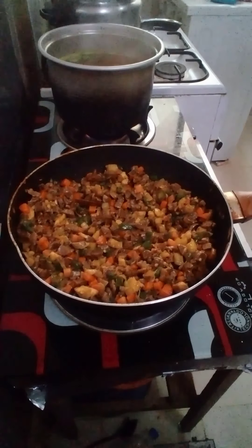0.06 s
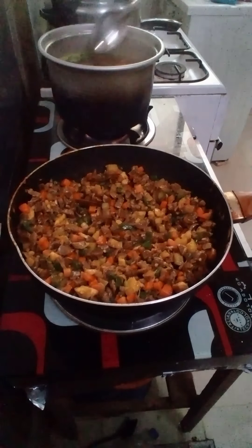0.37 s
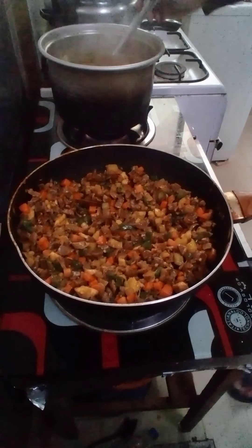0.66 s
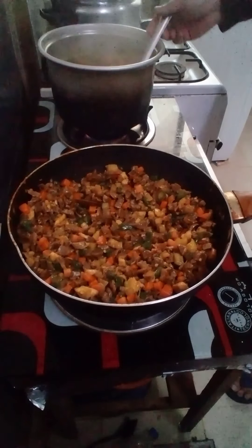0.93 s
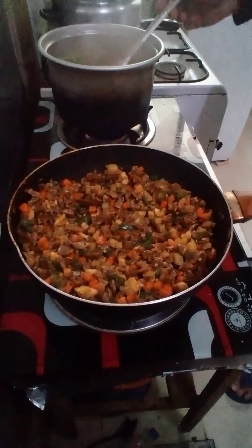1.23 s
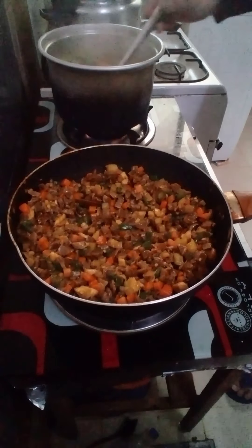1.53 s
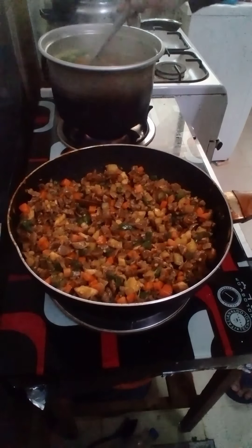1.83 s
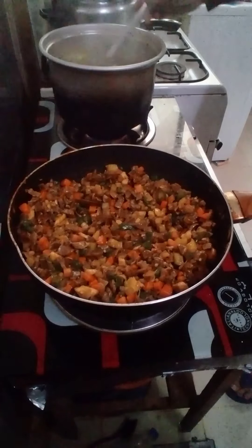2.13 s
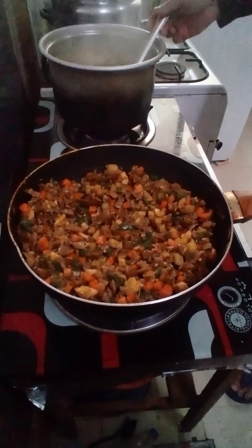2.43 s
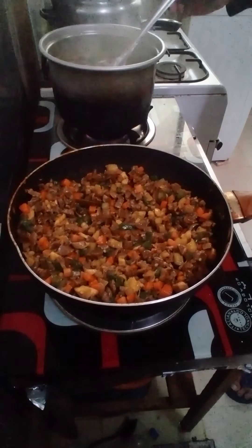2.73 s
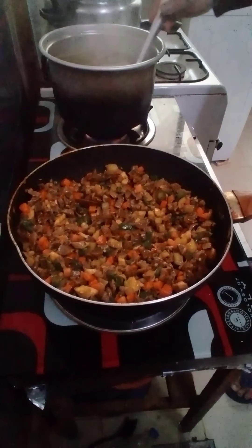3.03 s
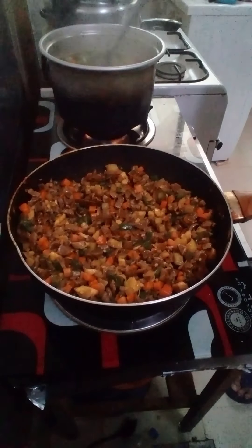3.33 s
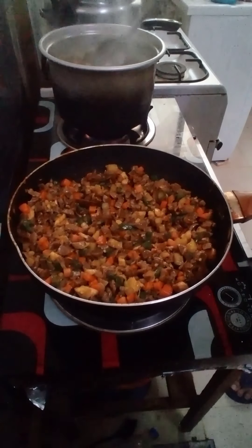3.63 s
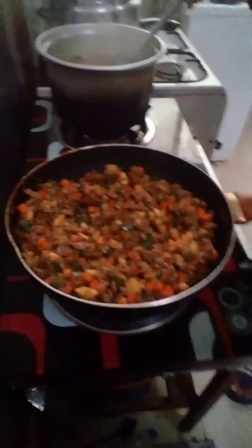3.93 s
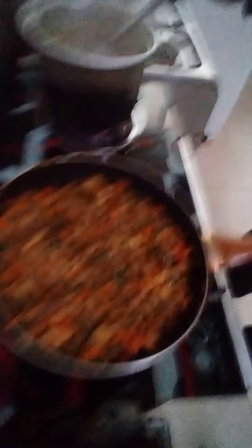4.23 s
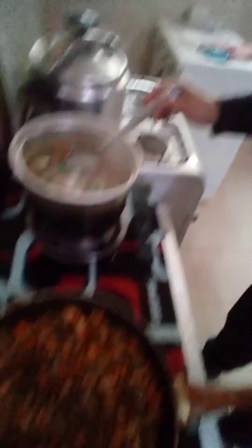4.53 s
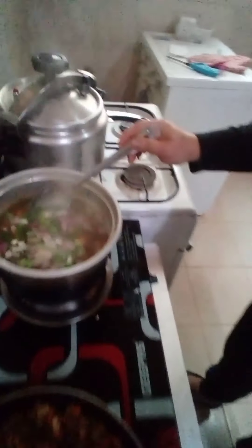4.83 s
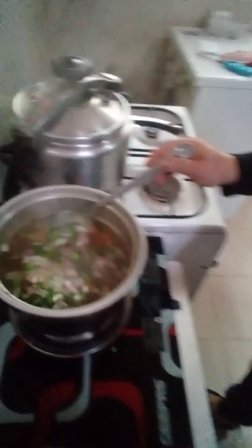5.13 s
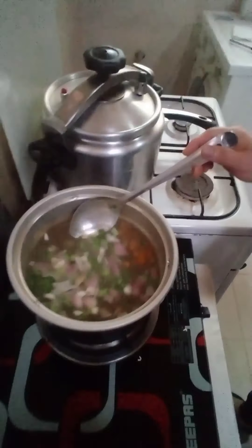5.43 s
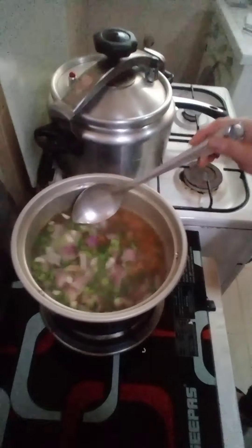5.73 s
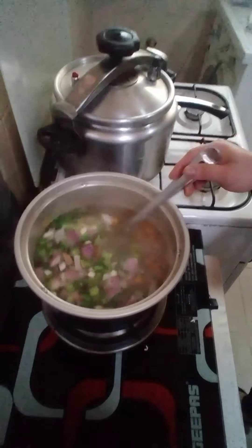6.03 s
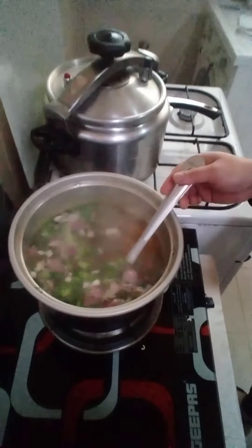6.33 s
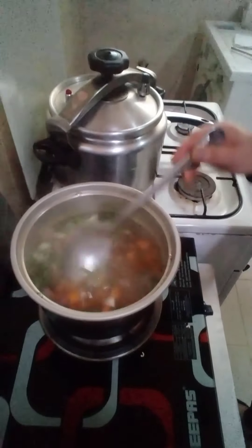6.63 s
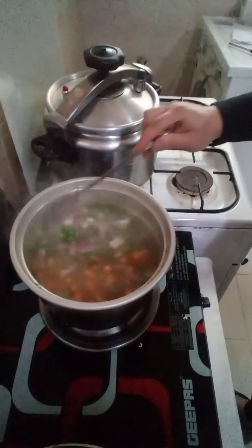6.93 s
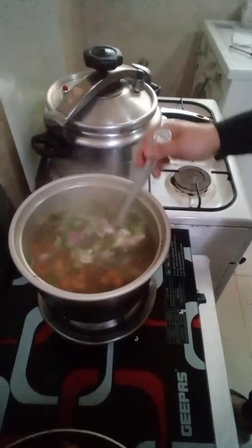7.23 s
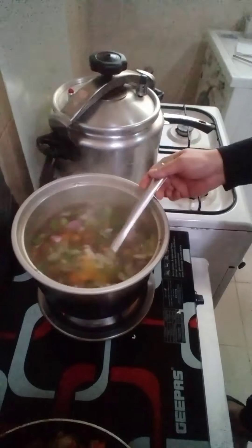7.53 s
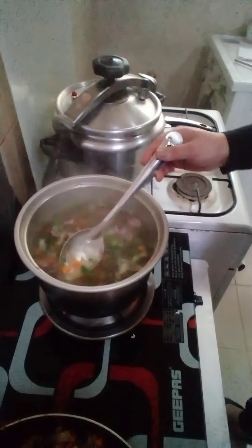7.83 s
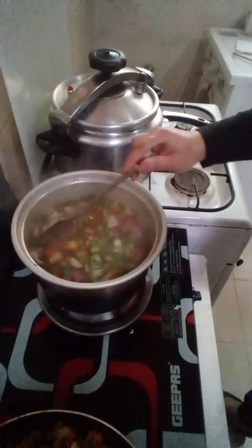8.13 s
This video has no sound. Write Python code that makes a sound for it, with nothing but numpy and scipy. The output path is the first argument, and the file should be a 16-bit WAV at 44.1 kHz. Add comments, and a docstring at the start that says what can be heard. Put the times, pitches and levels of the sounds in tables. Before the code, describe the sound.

Close by in a small kitchen with hard walls, a ladle clanks and rasps against a metal pot, rocking it with dull thuds as simmering soup swishes. A single hollow clack from the stove falls in a quieter stretch, followed by another run of knocks, light ticks and squeaky scrapes. A low room drone and the soft rumble and thin hiss of a gas burner continue throughout.

```python
"""A steel ladle stirs soup in an aluminium pot: it knocks, rings and scrapes, and the pot rocks.
The soup swishes, simmers and plops; something bumps the hollow stove once.
Behind it the gas flame rumbles with a thin hiss and faint whistles.
The small hard-walled kitchen drones and echoes."""
import sys
import numpy as np
from scipy import signal
from scipy.fft import rfft, irfft, next_fast_len
from scipy.io import wavfile
from scipy.ndimage import uniform_filter1d, map_coordinates

SR = 44100
rng = np.random.default_rng(int(sys.argv[2]) if len(sys.argv) > 2 else 0)


def file_out(sig):
    """Save sig as 16-bit WAV at sys.argv[1]."""
    # one column per channel
    cols = np.atleast_2d(sig).T
    # limit, then scale
    lim = np.clip(cols, -1, 1)
    pcm = np.round(lim * 32767).astype(np.int16)
    wavfile.write(sys.argv[1], SR, pcm)


N = 365148
T = np.arange(SR * 3 // 5) / SR  # time within one event, s

# spectrum of a steel tick: freq_hz, gain_db
TICK_SPECTRUM = [(300, 6.5), (1500, 0), (3000, 2.5), (4700, 3), (6500, 2), (7700, 9.5), (8800, -0.5),
                 (12000, 1), (15500, -9)]


def amp(db):
    """Decibels to gain."""
    return 10 ** (np.asarray(db) / 20)


def unit(x):
    """x at rms 1."""
    return x / np.sqrt(np.mean(x ** 2) + 1e-20)


def along(points, hz):
    """Interpolate (freq_hz, value) points on a log axis."""
    freqs_hz, values = np.transpose(points)
    return np.interp(np.log(hz + 1), np.log(freqs_hz), values)


def curve(points):
    """Interpolate (time_s, value) points at every sample."""
    return np.interp(np.arange(N) / SR, *np.transpose(points))


def nearness(hz, centre_hz, reach):
    """Gaussian in log frequency, 1 at the centre."""
    return np.exp(-(np.log(hz / centre_hz) / reach) ** 2)


def wobble(rate_hz):
    """Smooth curve through random knots."""
    knots = rng.standard_normal(int(N * rate_hz / SR) + 4)
    return map_coordinates(knots, [np.arange(N) * rate_hz / SR])


def filtered(x, response):
    """x through the frequency response response(hz)."""
    size = next_fast_len(len(x) + 8192)
    return irfft(rfft(x, size) * response(np.fft.rfftfreq(size, 1 / SR)), size)[:len(x)]


def coloured(x, spectrum, size=2048):
    """x through the minimum-phase filter with this spectrum."""
    gain = amp(along(spectrum, np.fft.rfftfreq(size, 1 / SR)))
    cepstrum = irfft(np.log(gain))
    cepstrum[1:size // 2] *= 2
    cepstrum[size // 2 + 1:] = 0
    impulse = irfft(np.exp(rfft(cepstrum)))
    return signal.fftconvolve(x, impulse)[:len(x)]


def rush(spectrum):
    """Steady shaped noise, rms 1."""
    return unit(filtered(rng.standard_normal(N), lambda hz: amp(along(spectrum, hz))))


def fade(t60_s, time_s=T):
    """Decay by 60 dB in t60_s."""
    return np.exp(-np.log(1000) * time_s / t60_s)


def blow(x, db):
    """Scale x to db rms over its first 29 ms."""
    return amp(db) * x / np.std(x[:1300])


def add(track, start_s, sound):
    """Mix sound into track."""
    part = track[round(start_s * SR):][:len(sound)]
    part += sound[:len(part)]


def kitchen_echo():
    """Diffuse wall reflections: a fresh noise tail of energy 1, 3 ms late."""
    # reverberation: freq_hz, t60_s
    decay = [(150, 0.48), (500, 0.39), (2000, 0.53), (7000, 0.4), (15000, 0.44)]
    hz, time_s, bands = signal.stft(rng.standard_normal(len(T)), SR, nperseg=256)
    tail = signal.istft(bands * fade(along(decay, hz)[:, None], time_s), SR, nperseg=256)[1]
    return np.pad(tail / np.linalg.norm(tail), (round(0.003 * SR), 0))[:len(T)]


def in_room(x, wet_db):
    """x plus its echoes."""
    return x + amp(wet_db) * signal.fftconvolve(x, kitchen_echo())[:len(x)]


def burst(spectrum, t60_s, wet_db, rise_s):
    """Crowded modes as decaying noise, plus echo."""
    puff = rng.standard_normal(len(T)) * fade(t60_s) * (1 - np.exp(-T / rise_s))
    return coloured(puff / np.linalg.norm(puff) + amp(wet_db) * kitchen_echo(), spectrum)


def ring(modes, scatter_db, near_hz=1000, favour_db=0, reach=0.13):
    """Struck modes; those close to near_hz gain up to favour_db."""
    out = np.zeros(len(T))
    for k, (hz, db, t60_s) in enumerate(modes):
        level_db = db + favour_db * nearness(hz, near_hz, reach) + scatter_db * rng.standard_normal()
        onset = 1 - np.exp(-2 * hz * T)
        out += (-1) ** k * amp(level_db) * np.cos(2 * np.pi * hz * T) * fade(t60_s) * onset
    return out


def kitchen_drone():
    """Steady low tones with wandering phase."""
    # drone tones: pitch_hz, level_db
    tones = [(69, -59), (100, -61.5), (355, -71), (463, -65.5)]
    time_s = np.arange(N) / SR
    return sum(amp(db) * unit(np.sin(2 * np.pi * hz * time_s + 1.13 * wobble(7.8))) for hz, db in tones)


def gas_burner():
    """The flame rumbles; the gas jet hisses, with a narrow, slowly sinking whistle."""
    # rumble and hiss spectra: freq_hz, gain_db
    flame_spectrum = [(20, -50), (30, -20), (45, -6.5), (68, 0), (85, -3), (140, -1.5), (200, -9.5),
                      (290, -3), (470, -5.5), (520, -15), (800, -22), (2000, -38.5)]
    hiss_spectrum = [(2000, -32), (3500, -12.5), (5000, 4), (6200, 10.5), (7000, 8.5), (7700, 15),
                     (8700, -7), (10500, 5), (12300, 7), (13500, -7), (15500, -25)]
    # rumble and jet whistle envelopes: time_s, level_db
    flame_level = [(1.2, -47.5), (2.8, -52), (8.28, -52)]
    jet_level = [(0, -65.5), (3.0, -70), (4.2, -62.5), (4.7, -71.5), (5.7, -71), (8.28, -72)]
    start_hz, sag_hz_per_s, hiss_db = 6533, 27, -67.5
    jet_hz = start_hz - sag_hz_per_s * np.arange(N) / SR
    flutter = filtered(rng.standard_normal(N), lambda hz: 1 / np.hypot(1, hz / 70) / np.hypot(1, hz / 600))
    jet = amp(curve(jet_level)) * unit(flutter * np.sin(2 * np.pi * np.cumsum(jet_hz) / SR))
    rumble = amp(curve(flame_level)) * rush(flame_spectrum)
    return rumble + jet + amp(hiss_db) * rush(hiss_spectrum)


def whistles():
    """Faint, very high whistles swell, glide and fade."""
    # whistles: start_s, length_s, peak_db, start_hz, glide_hz_per_s
    glides = [(7.76, 0.18, -67, 10900, 8800), (7.92, 0.27, -65, 10300, -900)]
    waver_hz = 110
    out = np.zeros(N)
    for start_s, length_s, db, start_hz, glide_hz_per_s in glides:
        hz = start_hz + glide_hz_per_s * T + waver_hz * wobble(300)[:len(T)]
        swell = np.sin(np.pi * np.minimum(T / length_s, 1))
        add(out, start_s, amp(db) * swell * np.sin(2 * np.pi * np.cumsum(hz) / SR))
    return out


def soup():
    """Broth simmers and swishes with each sweep; tiny bubbles burst; drops plop with rising pitch."""
    # liquid noise: freq_hz, gain_db
    spectrum = [(300, -7), (600, 3.5), (900, -0.5), (1400, 0.5), (1850, 0.5), (2100, -3.5), (2700, -4),
                (3200, -14.5), (5000, -24), (12000, -20.5)]
    # ladle sweeps: fastest_s, half_length_s, level_db
    sweeps = [(0.35, 0.17, -53.5), (0.943, 0.081, -49.5), (2.388, 0.083, -56), (3.266, 0.075, -53.5),
              (6.12, 0.056, -46)]
    # drops: start_s, level_db, start_hz
    plops = [(0.424, -56, 1600), (1.639, -46, 770), (2.382, -42.5, 1380), (2.812, -57.5, 1880),
             (3.33, -61, 726), (4.091, -44, 860), (5.881, -53.5, 730), (7.52, -52, 790)]
    rest_db, bubbles_re_swish_db, bubbles_per_s = -58.5, -14, 60
    time_s = np.arange(N) / SR
    sweep_power = sum(amp(db) ** 2 * np.exp(-((time_s - fastest_s) / half_s) ** 2)
                      for fastest_s, half_s, db in sweeps)
    motion = np.sqrt(amp(rest_db) ** 2 + sweep_power)
    pops = (rng.random(N) < bubbles_per_s / SR) * rng.standard_normal(N)
    simmer = unit(in_room(coloured(pops, spectrum), wet_db=-3))
    swish = amp(0.4 * wobble(23)) * rush(spectrum)
    out = motion * (swish + amp(bubbles_re_swish_db) * simmer)
    for start_s, db, hz in plops:
        chirp = np.sin(2 * np.pi * hz * T * (1 + T)) * fade(t60_s=0.024)
        bubble = unit(in_room(chirp, wet_db=-1.5))
        splash = unit(burst(spectrum, t60_s=0.034, wet_db=1, rise_s=0.004))
        add(out, start_s, blow(bubble + 0.43 * splash, db))
    return out


def stove_knock():
    """One bump on the stove: a clack, and its hollow body rings."""
    # stove body: freq_hz, gain_db, t60_s
    body_modes = [(171, 1, 0.13), (224, -10, 0.13), (315, 1, 0.16), (357, -9, 0.12), (520, -14, 0.17),
                  (878, -16, 0.25), (1166, -13, 0.29), (1320, -14, 0.19), (1723, -13, 0.13),
                  (1910, -14, 0.24), (2284, -16, 0.28), (2650, -21, 0.18)]
    # clack: freq_hz, gain_db
    clack_spectrum = [(120, 0.5), (300, 0.5), (550, -14), (900, -2.5), (1800, -0.5), (2800, -10),
                      (3500, -7), (5000, -17), (8000, -15), (15500, -36)]
    out = np.zeros(N)
    body = blow(in_room(ring(body_modes, scatter_db=2.7), wet_db=-6.5), db=-28.5)
    clack = blow(burst(clack_spectrum, t60_s=0.098, wet_db=-4.5, rise_s=0.00067), db=-33)
    add(out, start_s=4.032, sound=body + clack)
    return out


def handle_taps():
    """The handle ticks lightly on the rim."""
    # taps: start_s, level_db
    taps = [(2.0028, -61), (2.8024, -69), (3.975, -61.5), (4.324, -60.5), (5.9125, -62), (5.9664, -44),
            (6.666, -59), (7.006, -50.5), (7.0776, -52.5), (7.345, -54), (7.8058, -61.5)]
    out = np.zeros(N)
    for start_s, db in taps:
        add(out, start_s, blow(burst(TICK_SPECTRUM, t60_s=0.014, wet_db=-6.5, rise_s=0.000091), db))
    return out


def ladle_scrapes():
    """Steel sticks and slips on the pot wall: tiny jolts make the metal squeal over a gritty rasp."""
    # rubs: start_s, length_s, squeal_db, rasp_db, pressure_db_per_s, favoured_hz
    strokes = [(0.174, 0.077, -68, -47.5, -10, 10800), (0.341, 0.17, -63, -61.5, 6, 5330),
               (0.565, 0.042, -49.5, -42, -70, 3900), (0.788, 0.077, -40, -49, -25, 4350),
               (0.94, 0.075, -44.5, -50, -15, 4070), (2.189, 0.15, -41, -60, -30, 5000),
               (3.168, 0.12, -65, -66, 0, 5000), (3.321, 0.021, -59, -53.5, 0, 4200),
               (5.979, 0.16, -42, -50.5, 45, 5560), (7.221, 0.1, -47, -44, -94, 6700)]
    # rubbed metal: freq_hz, width_hz, gain_db
    resonances = [(450, 50, 7), (800, 47, 6.5), (1086, 51, -1), (2520, 600, -21), (2984, 100, 2.5),
                  (3275, 150, 0.5), (3924, 59, -1.5), (4760, 100, -5), (5660, 170, -6.5), (6440, 120, -3),
                  (6680, 50, -6), (7270, 110, -2), (7460, 50, -1.5)]
    # rasp: freq_hz, gain_db
    grit_spectrum = [(200, 7), (700, 8.5), (1800, -1), (3300, -5.5), (4400, -6.5), (6000, -10),
                     (7700, -1.5), (9000, -8), (12000, -11), (15500, -13)]
    attack_s, release_t60_s, slips_per_s = 0.01, 0.19, 5000
    out = np.zeros(N)
    for start_s, length_s, squeal_db, rasp_db, pressure_db_per_s, favoured_hz in strokes:
        pressure = np.minimum(T / attack_s, 1) * amp(pressure_db_per_s * np.minimum(T, length_s))
        pressure *= fade(release_t60_s, np.maximum(T - length_s, 0))  # lift-off
        slips = (rng.random(len(T)) < slips_per_s / SR) * rng.standard_normal(len(T))
        judder_db = 1.7 * unit(uniform_filter1d(rng.standard_normal(len(T)), size=300))
        slips *= amp(judder_db)
        squeal = np.zeros(len(T))
        for hz, width_hz, db in resonances:
            favour_db = 6.5 * nearness(hz, favoured_hz, reach=0.19)  # set by the place rubbed
            band = filtered(slips, lambda f: 1j * f * width_hz / (hz ** 2 - f ** 2 + 1j * f * width_hz))
            squeal += amp(db + favour_db) * band
        grit = [(hz, db + 11 * nearness(hz, favoured_hz, reach=0.32)) for hz, db in grit_spectrum]
        rasp = coloured(slips, grit)
        scrape = pressure * (amp(squeal_db) * unit(squeal) + amp(rasp_db) * unit(rasp))
        add(out, start_s, in_room(scrape, wet_db=-7.5))
    return out


def ladle_strikes():
    """Each strike ticks, rocks the pot and rings base, wall, rim and ladle; its place favours some modes."""
    # strikes: start_s, thud_db, thud_hz, base_db, wall_db, wall_hz, tick_db, rim_db, rim_hz
    strikes = [(0.1675, -44.5, 298, -39.5, -43.5, 870, -54, -80, 3960),
               (0.5554, -63, 350, -45, -34, 2440, -41.5, -44, 2940),
               (0.7507, -27.5, 310, -24.5, -27, 900, -41.5, -66, 3260),
               (0.7593, -28.5, 300, -26, -43, 720, -35.5, -44.5, 3260),
               (1.0416, -37, 340, -30.5, -26.5, 597, -32, -34.5, 3480),
               (1.57, -40, 363, -39.5, -33, 588, -42, -58, 2960),
               (2.0289, -50, 330, -38.5, -42.5, 636, -62, -66, 3260),
               (2.1731, -50, 260, -37.5, -40.5, 680, -33.5, -43.5, 3260),
               (2.263, -25, 279, -24.5, -37, 710, -44.5, -49, 3960),
               (2.5438, -40, 334, -36, -37.5, 583, -43.5, -65, 4800),
               (3.132, -41, 303, -36.5, -40, 850, -53.5, -60, 2850),
               (5.946, -49, 330, -32.5, -39, 1230, -36, -42.5, 4360),
               (6.13, -46, 330, -46, -39.5, 1760, -44, -46, 2960),
               (6.158, -33.5, 254, -32, -40.5, 605, -41, -60, 2960),
               (6.242, -56, 330, -41, -45, 665, -40.5, -47, 2850),
               (6.3414, -37.5, 337, -30, -33.5, 614, -33, -50, 2960),
               (7.0109, -46.5, 350, -37, -46, 575, -58, -80, 3260),
               (7.151, -39, 355, -50, -27.5, 1150, -32.5, -45, 4500),
               (7.2254, -26.5, 253, -27, -31.5, 2310, -39.5, -63, 2960),
               (7.416, -60, 330, -45, -55.5, 736, -72, -84, 3260)]
    # pot and ladle modes: freq_hz, gain_db, t60_s
    rocking_modes = [(178, -7.5, 0.065), (239, -1.5, 0.15), (285, 0, 0.052), (338, -2.5, 0.18)]
    base_modes = [(405, -6, 0.098), (436.3, -6.5, 0.13), (463.2, -6.5, 0.13), (535, -17, 0.13)]
    wall_modes = [(612.3, -5.5, 0.16), (709.5, 3.5, 0.13), (808, -7.5, 0.18), (860, -8.5, 0.17),
                  (1016, -6.5, 0.27), (1108, 3.5, 0.095), (1398, -4, 0.3), (1676, -8, 0.19),
                  (1840, -4, 0.12), (2133, -4.5, 0.15), (2430, -13, 0.11), (2584, -7, 0.1)]
    rim_modes = [(2958, -3, 0.15), (3259, -0.5, 0.19), (3960, -2.5, 0.24), (4770, -4, 0.12)]
    ladle_modes = [(5560, -15, 0.12), (6370, -3, 0.14), (6750, 4, 0.14), (7300, -7, 0.13),
                   (7610, 10.5, 0.24), (7500, 11, 0.13), (7950, 1, .18), (10300, -2, 0.14)]
    # crowded wall modes: freq_hz, gain_db
    clank_spectrum = [(100, -39), (350, -3.5), (600, -0.5), (800, 0.5), (1100, -2), (1500, -5),
                      (1900, -6.5), (2400, -9), (3200, -12.5), (6000, -38), (16000, -88)]
    # echo drops as the listener nears the pot: time_s, offset_db
    echo_offset = [(4, 1.5), (5.8, -0.5)]
    out = np.zeros(N)
    for start_s, thud_db, thud_hz, base_db, wall_db, wall_hz, tick_db, rim_db, rim_hz in strikes:
        room_db = np.interp(start_s, *np.transpose(echo_offset))
        thud = ring(rocking_modes, scatter_db=2, near_hz=thud_hz, favour_db=7.5)
        thud = blow(in_room(thud, room_db - 6.5), thud_db)
        base = ring(base_modes, scatter_db=4.5, near_hz=wall_hz, favour_db=23)
        base = blow(in_room(base, room_db - 6), base_db)
        wall = ring(wall_modes, scatter_db=2, near_hz=wall_hz, favour_db=18.5, reach=0.093)
        wall = blow(in_room(wall, room_db - 9), wall_db - 4)
        rim = ring(rim_modes, scatter_db=2.7, near_hz=rim_hz, favour_db=16, reach=0.1)
        rim = blow(in_room(rim, room_db - 10.5), rim_db)
        ladle = blow(in_room(ring(ladle_modes, scatter_db=7), room_db - 4), tick_db - 10.5)
        crowded = []
        for hz, db in clank_spectrum:
            low_cut_db = 4 * max(0, np.log2(0.5 * wall_hz / hz))  # a stiff spot barely drives slow modes
            crowded.append((hz, db + 6 * nearness(hz, wall_hz, reach=0.99) - low_cut_db))
        clank = blow(burst(crowded, t60_s=0.019, wet_db=room_db - 3.5, rise_s=0.00025), wall_db - 1.77)
        tick = blow(burst(TICK_SPECTRUM, t60_s=0.023, wet_db=room_db - 4.5, rise_s=0.00043), tick_db)
        add(out, start_s, thud + base + wall + rim + ladle + clank + tick)
    return out


def scene():
    """Mono mix of everything at the stove."""
    metal = ladle_strikes() + handle_taps() + stove_knock() + ladle_scrapes()
    return (metal + soup() + gas_burner() + kitchen_drone() + whistles())[None]


def record(dry):
    """Brick-wall low-pass."""
    cutoff_hz = 15600
    return filtered(dry[0], lambda hz: hz < cutoff_hz)[None]


dry = scene()
out = record(dry)
file_out(out)
```